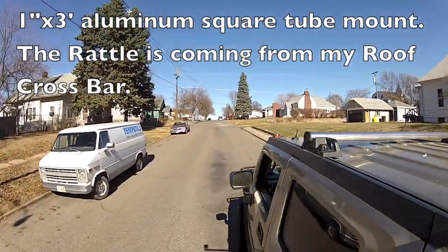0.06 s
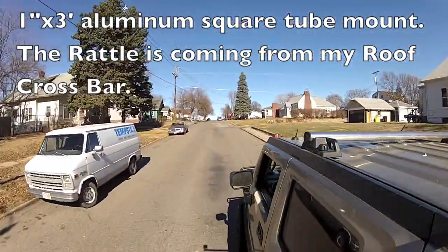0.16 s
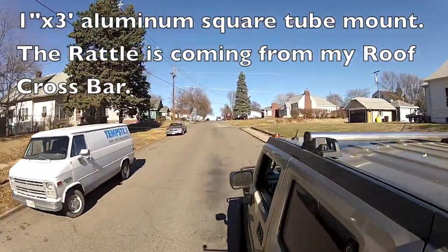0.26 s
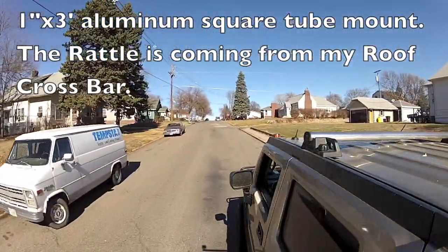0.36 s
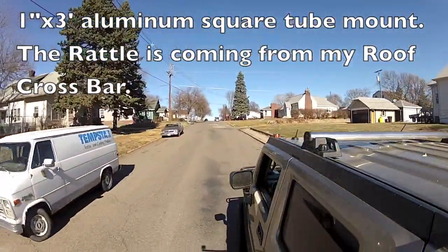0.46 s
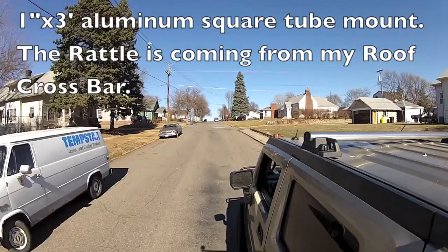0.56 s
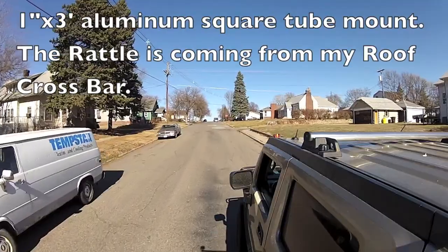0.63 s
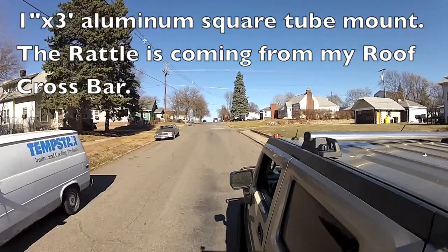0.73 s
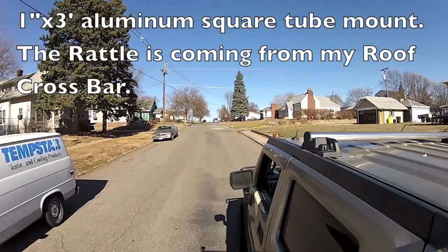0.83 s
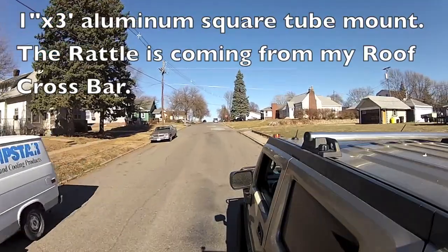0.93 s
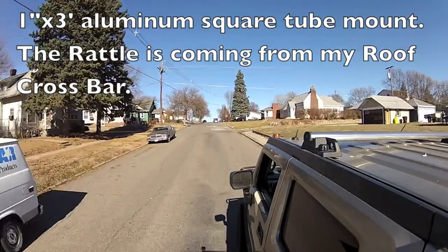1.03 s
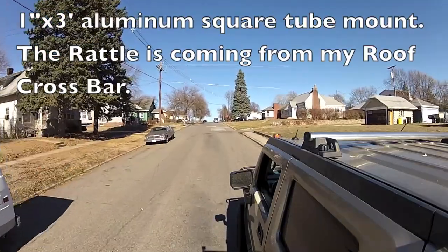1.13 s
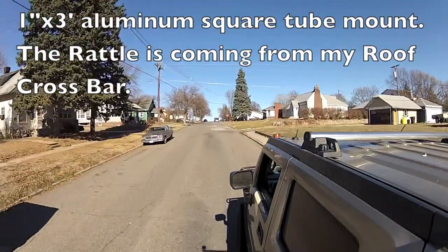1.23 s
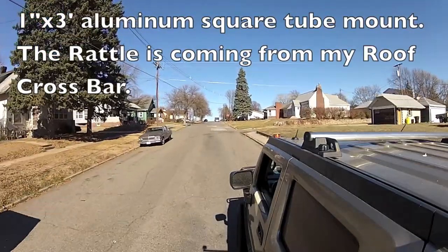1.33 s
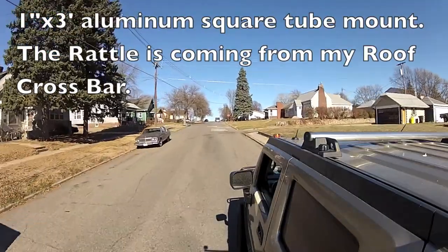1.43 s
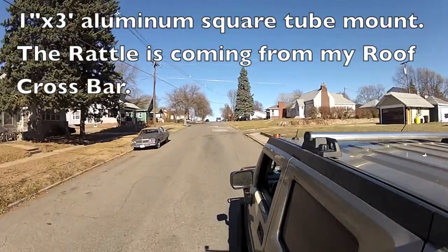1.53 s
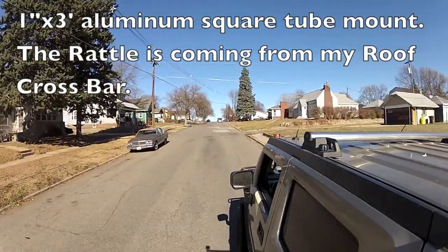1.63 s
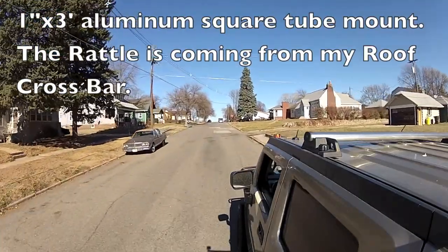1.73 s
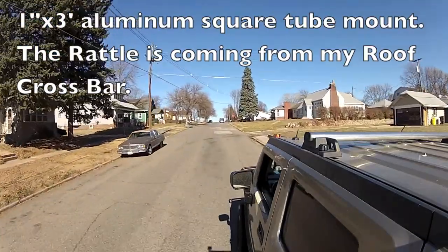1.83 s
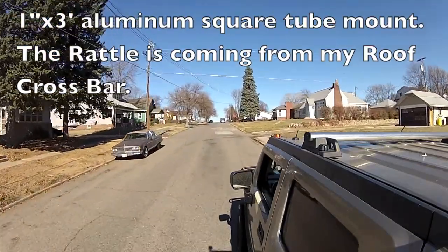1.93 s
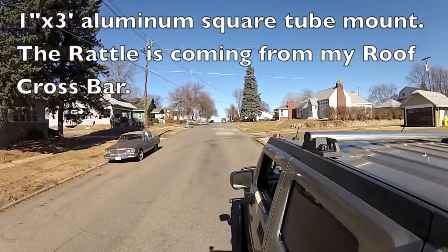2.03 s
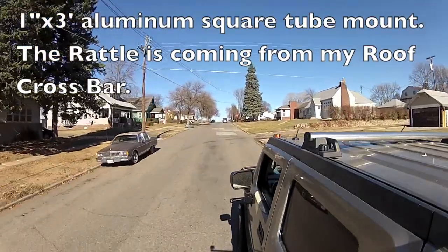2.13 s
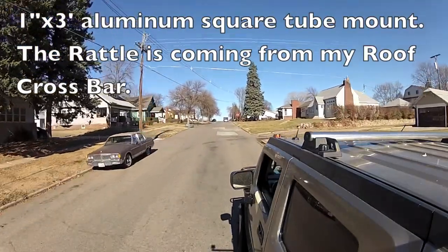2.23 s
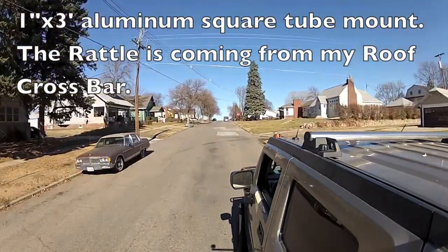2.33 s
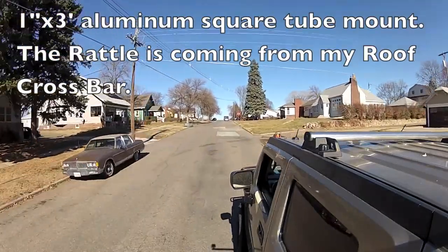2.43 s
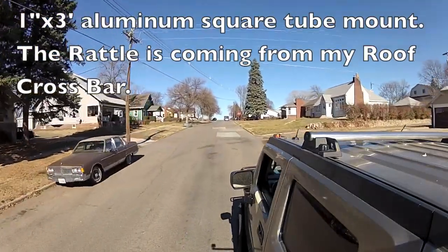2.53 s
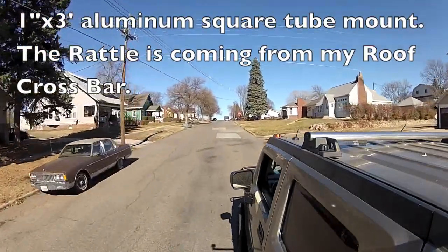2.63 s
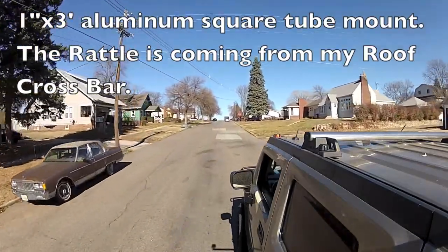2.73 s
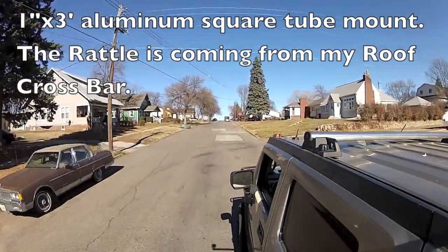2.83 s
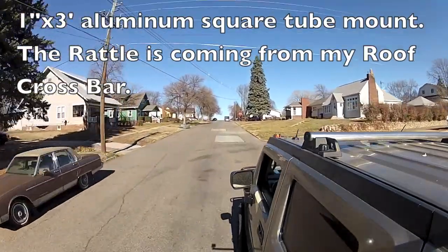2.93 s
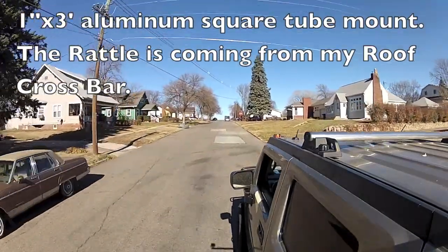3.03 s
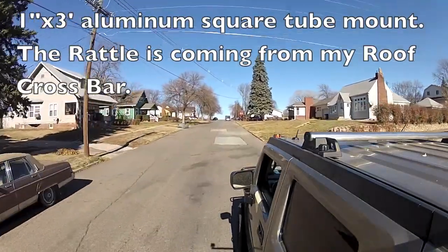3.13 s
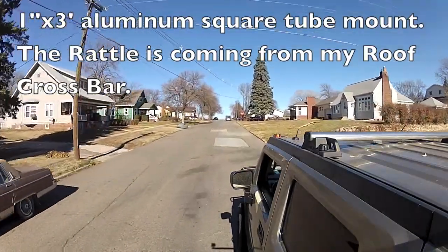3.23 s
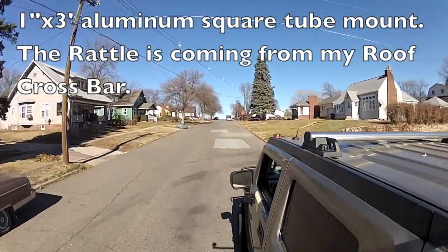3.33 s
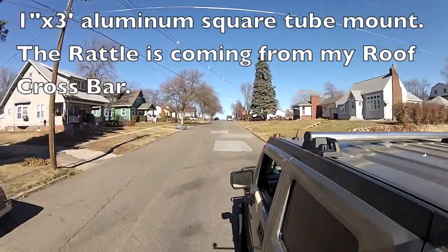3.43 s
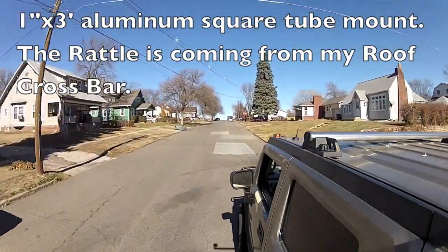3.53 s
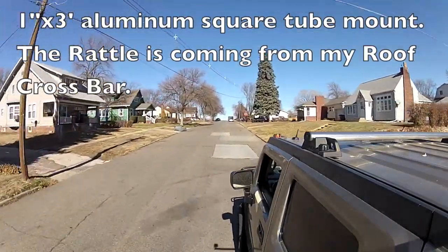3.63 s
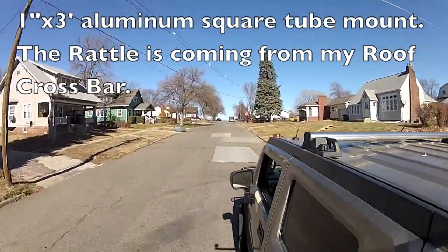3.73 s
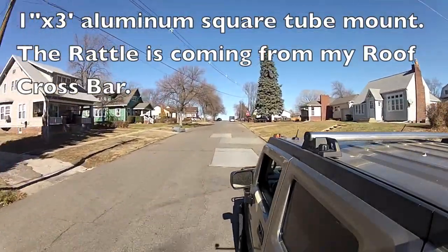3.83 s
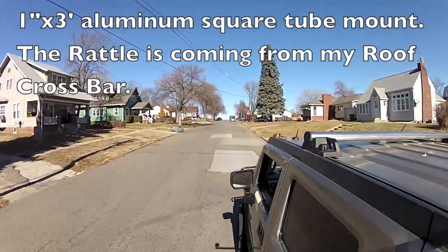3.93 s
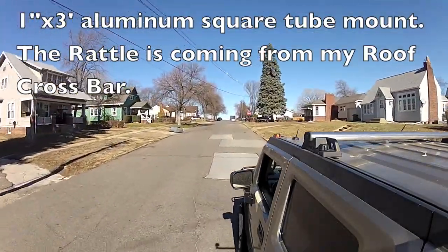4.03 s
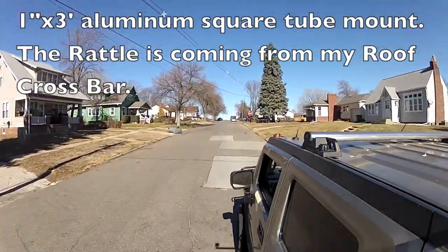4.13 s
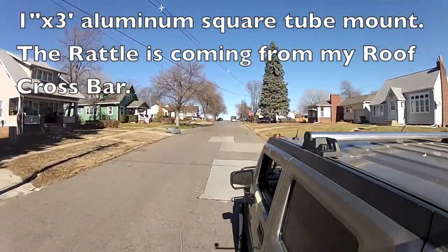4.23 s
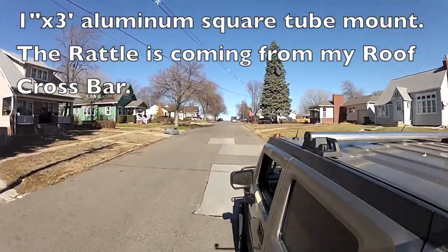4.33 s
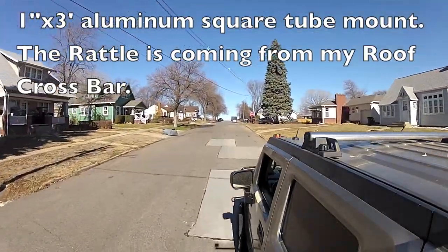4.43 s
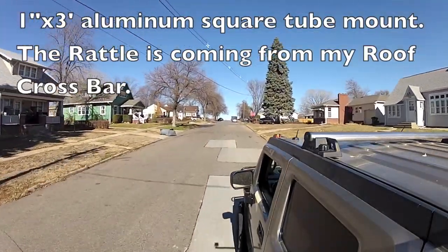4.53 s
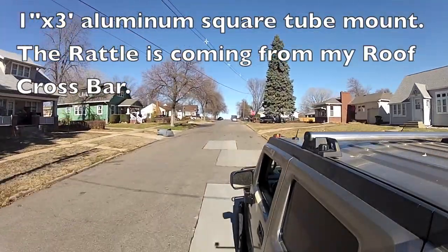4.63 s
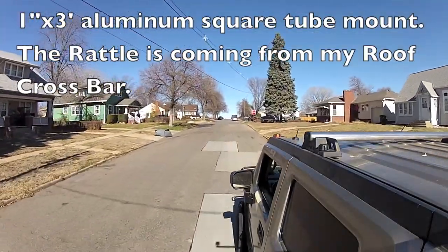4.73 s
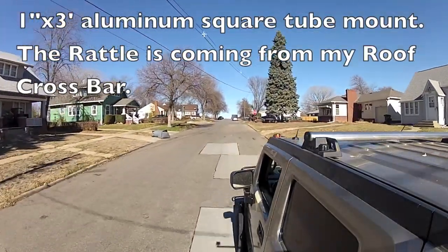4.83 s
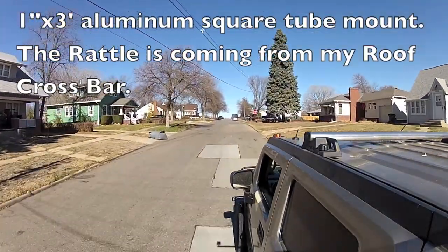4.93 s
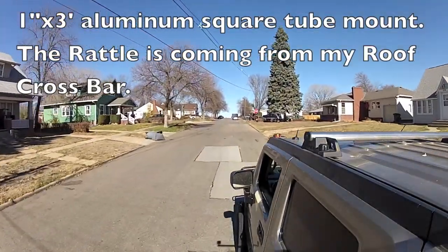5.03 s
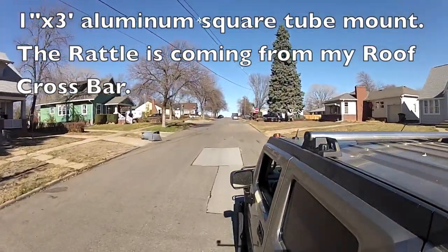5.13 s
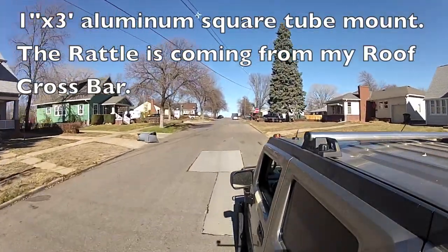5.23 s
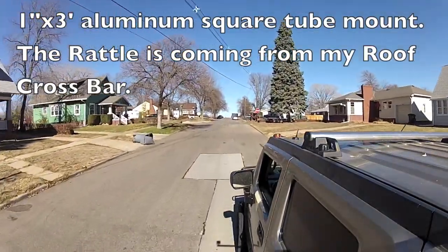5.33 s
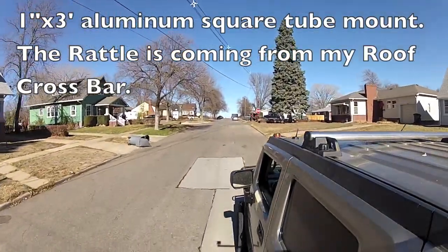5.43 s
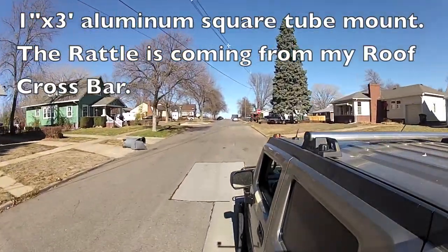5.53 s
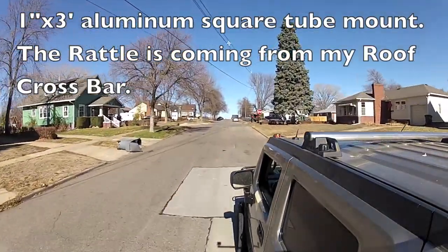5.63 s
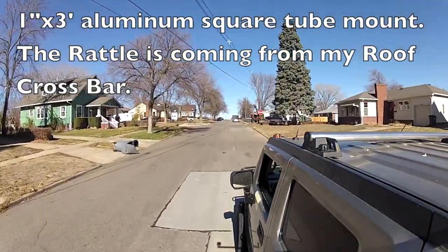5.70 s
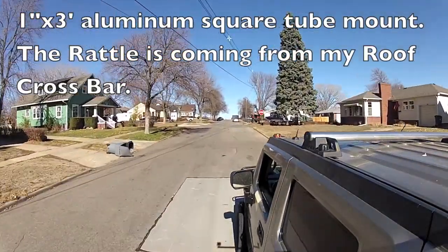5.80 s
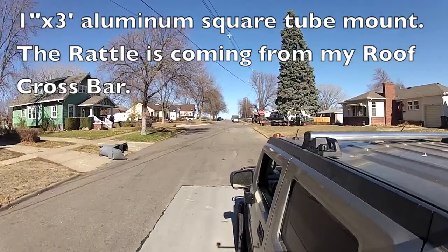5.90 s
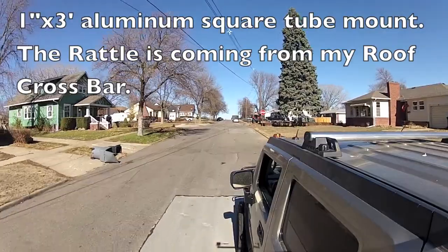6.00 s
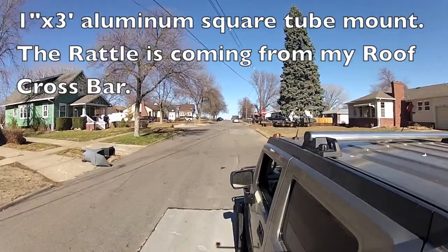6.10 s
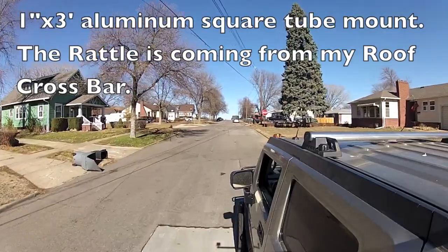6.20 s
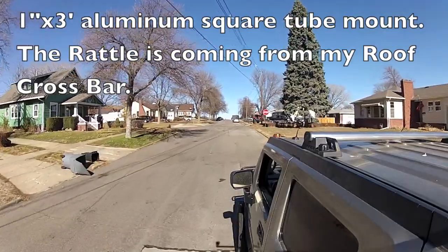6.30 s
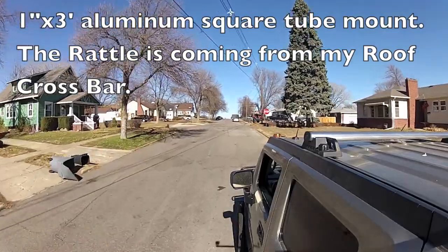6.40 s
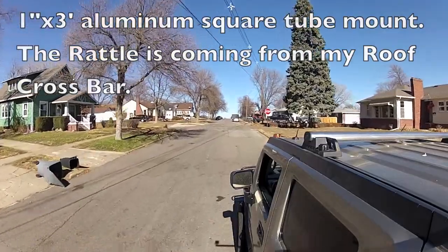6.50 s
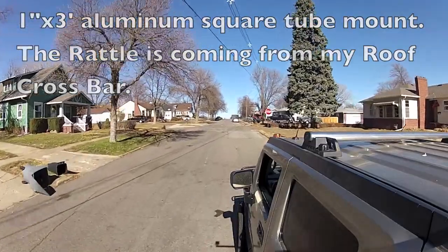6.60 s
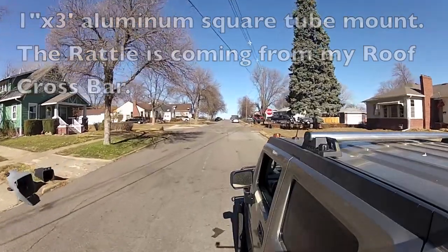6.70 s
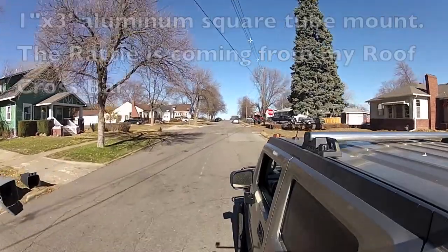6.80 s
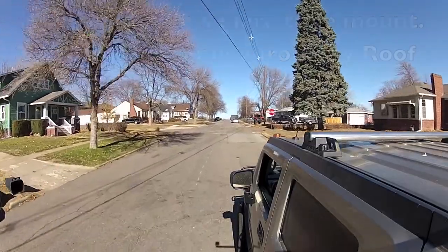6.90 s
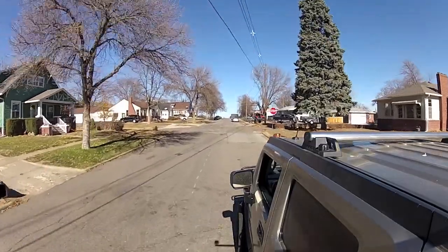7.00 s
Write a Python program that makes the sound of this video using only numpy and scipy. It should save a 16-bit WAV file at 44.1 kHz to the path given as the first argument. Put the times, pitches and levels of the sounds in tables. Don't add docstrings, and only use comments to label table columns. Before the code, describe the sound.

On a roof-mounted camera in a closed housing, a large vehicle's low engine note climbs, then fades beneath rumble and rising wind hiss. A brief squeak comes early. The engine drops out near the middle, and a loose cross bar breaks into dense knocks, bright ticks and a low rail hum over heavy road thumps.

```python
import sys
import numpy as np
from scipy import signal
from scipy.fft import next_fast_len
from scipy.io import wavfile
from scipy.ndimage import uniform_filter1d

SR = 44100
rng = np.random.default_rng(int(sys.argv[2]) if len(sys.argv) > 2 else 0)


def bounce(signal):
    frames = np.transpose(np.atleast_2d(signal))
    limited = np.clip(frames, -1, 1)
    pcm = np.round(limited * 32767).astype(np.int16)
    wavfile.write(sys.argv[1], SR, pcm)


def voltage_ratio(level):
    return 10 ** (np.asarray(level, float) / 20)


N = 311346
T = np.arange(N) / SR

# [t/s, level/dB]
ROAD = [(0, -43.5), (.65, -40.5), (1.4, -41), (1.6, -39), (2.4, -37.5), (2.7, -39.5), (3.1, -37),
        (3.5, -38), (4.2, -35.5), (4.4, -39.5), (4.6, -35), (5.07, -40.5), (5.4, -35.5), (6.05, -40.5),
        (6.4, -37.5), (7.06, -42)]
# [t/s, peak level/dB, fall/s]
HEAVES = [(.86, -18.5, 0.069), (.97, -21, 0.092), (7.0, -9.5, 0.078), (1.43, -20, 0.059),
          (1.68, -18.5, 0.16), (2.08, -19, 0.32), (2.3, -32, 0.44), (2.8, -13, 0.047), (2.91, -20, 0.09),
          (3.07, -12, .06), (3.19, -8, 0.044), (3.29, -14, 0.033), (3.48, -19.5, 0.16), (3.67, -18, 0.17),
          (3.98, -17.5, 0.22), (4.21, -30, .2), (4.58, -7, 0.084), (4.69, -17, 0.03), (4.92, -11.5, 0.095),
          (5.13, -17, 0.081), (5.25, -36.5, 0.073), (5.41, -11.5, 0.076), (5.64, -16.5, 0.039),
          (5.82, -12.5, 0.06), (5.97, -12.5, 0.053), (6.06, -15, 0.046), (6.17, -11.5, 0.039),
          (6.38, -8.5, 0.13), (6.56, -11, 0.13), (6.88, -11, 0.067)]
# [t/s, peak level/dB, fall/s]
JOLTS = [(.6, -20.5, .1), (.86, -30, .1), (1.0, -23, 0.4), (1.26, -16.5, 0.081), (1.48, -26, 0.18),
         (1.63, -20, 0.13), (2.08, -19, 0.19), (2.38, -20.5, 0.3), (2.79, -23, 0.1), (3.0, -26, 0.09),
         (3.14, -18.5, 0.054), (3.22, -18.5, 0.054), (3.44, -16.5, 0.074), (3.77, -17, 0.19),
         (4.21, -18, 0.092), (4.6, -17, 0.054), (4.69, -21, 0.38), (4.95, -10.5, 0.059), (5.33, -16, 0.13),
         (5.53, -10, 0.052), (5.64, -28, 0.029), (5.82, -16.5, 0.093), (5.93, -19.5, 0.067),
         (6.12, -18, 0.039), (6.18, -20.5, 0.048), (6.28, -22.5, 0.096), (6.4, -20, 0.18),
         (6.56, -24, 0.17), (6.88, -25, 0.036), (7.05, -20, 0.098)]
# [f/Hz, width/Hz, level/dB]
FIRST_BENDING = [(27.45, 8.5, 2), (39.34, 7.6, 2)]
SECOND_BENDING = [(107.8, 11.6, 2.5), (132.7, 33, -6.5)]
UPPER_BODY = [(66.7, 35.2, 7), (157.7, 62.7, 3), (272.7, 65.4, -0.5), (325.2, 52.7, 1), (442.8, 9.2, -0.5),
              (528, 37, -9.5), (694, 74, -12.5), (745, 13, -16), (1006, 81, -11.5), (1150, 69, -13.5)]
# [t/s, f/Hz]
SECOND_BENDING_PITCH = [(.62, 122.5), (1.3, 118.9), (1.55, 110.2), (2.0, 114.4), (2.4, 115.6), (2.7, 112),
                        (3.6, 112.9), (4.4, 111.5), (5.28, 110), (7.06, 110.2)]
# [t/s, peak level/dB, low level/dB, body level/dB, high level/dB]
DROPS = [(0.1992, -30, 3, -1, -16), (0.4793, -34.5, -8, -5, -6), (0.5556, -36, 1, -1, -13),
         (0.5938, -33, -2, -2, -8), (0.9275, -33.5, -8, -9, -8), (2.6125, -26, -12, -9, -6),
         (3.4077, -29, 3, -10, -10), (4.1609, -24.5, -4, -10, -15), (4.4672, -27, -8, -7, -7),
         (4.5175, -30.5, 11, 2, 1), (4.557, -9.5, -5, -10, -10), (4.5895, -24, 4, -7, -9),
         (4.6175, -30, -5, -1, -2), (4.7526, -30, -5, -5, -2), (4.7661, -26, -1, -13, -12),
         (4.807, -24, -6, -10, -16), (4.8506, -11, -8, -12.5, -11), (4.9586, -24, -7, -3, -7),
         (5.179, -22.5, -9, -7, -20), (5.253, -21.5, -9, -0.5, -16), (5.3666, -29.5, -1, -11, -16),
         (5.4933, -26, -1, -9, -8), (5.5261, -15.5, -2, -12, -7), (5.7194, -21.5, -7, -5, -12),
         (5.7423, -18.5, -9, -5.5, -10), (5.7997, -20, -7, -7, -9), (6.0038, -33, 1, -7, -8),
         (6.1442, -15.5, -6, -17, -14), (6.3815, -29, 10, -4, -13), (6.6008, -22, 3, -3, -15),
         (6.6272, -24, 5, -7, -8), (6.6447, -16.5, -19, -6.5, -13), (6.7229, -22.5, -3, -7, -18),
         (6.8966, -16, -12, -20, -17), (7.0355, -24.5, 4, -9, -17)]
# [t/s, peak level/dB, low level/dB, body level/dB, high level/dB]
TAPS = [(3.971, -30, -3, -8, -4), (4.0463, -22.5, -4, -7, 3.5), (4.2638, -27.5, -4, -8, 4),
        (4.6425, -21, -14, -5, -1), (4.6644, -33, -7, -7, 0), (4.8918, -21, -8, -2.5, -3),
        (4.9254, -30, 5, 1, -5), (4.9854, -27, 0, -1, 2), (5.024, -26.5, -2, -4, 4),
        (5.1588, -32, -8, -9, 3), (5.232, -22.5, -12, -9, 3), (5.3124, -27.5, 2, -7, -2),
        (5.448, -23.5, -6, -9, -9), (5.5484, -30, 10, -3, -4), (5.5822, -23.5, -10, -11, 0),
        (5.627, -24, -12, -7, -1), (5.668, -23.5, -10, -7, 1), (5.8168, -20, -3, -11, -2),
        (5.871, -29.5, 0, -6, 2), (5.9065, -17.5, -15, -8, -8), (5.9508, -29, -8, -4, -7),
        (5.9924, -32, 0, -5, -1), (6.1684, -24, -12, -9, -1), (6.2395, -19.5, 5, -5.5, -2),
        (6.3261, -19.5, 3, -11, -4), (6.5133, -29.5, 6, -7, 4), (6.5435, -26.5, -3, -6, -4),
        (6.5625, -33, 6, -4, 2), (6.7074, -20.5, -10, -4, 1.5), (6.8864, -22.5, -11, -19, 2),
        (6.9481, -30, 3, -9, 1)]
# [t/s, peak level/dB, high level/dB]
MORE_TAPS = [(4.687, -36, 1), (4.724, -34, -6), (4.997, -31, -3), (5.301, -28, -15), (5.334, -29.5, -13),
             (5.775, -30, -9), (6.109, -29, -14), (6.206, -29, -16), (6.36, -28, -7), (6.468, -38, 9),
             (6.663, -34, -8), (6.688, -27, -18), (6.803, -31.5, -14), (6.974, -34, -3)]
# [f/Hz, level/dB, t60/s]
BAR_LOW = [(290, 3.5, 0.27), (322, 18.5, 0.05), (446, 4, 0.033)]
BAR_BODY = [(550, -1, 0.043), (648, 0.26, 0.066), (750, -0.9, 0.067)]
BAR_MIDDLE = [(960, 3, 0.045), (1050, 7.5, 0.045), (1140, 5, 0.04), (1400, -5, 0.025)]
BAR_HIGH = [(1667, 16, 0.033), (1645, 4.5, 0.03), (1860, -15, 0.011)]
# [t/s, f/Hz, level/dB]
ENGINE = [(0, 118.6, -18), (.32, 125.7, -15), (.45, 131, -16), (.53, 135, -18), (.553, 136.5, -34),
          (.575, 138, -22), (.7, 145.5, -25), (.85, 148.4, -23.5), (.95, 148.5, -29), (1.23, 152.8, -27),
          (1.43, 157.9, -30), (1.7, 166, -28), (1.86, 168.3, -28), (2.21, 166.8, -28.5), (2.87, 165.5, -33),
          (3.05, 157, -27.5), (3.18, 139.6, -28), (3.33, 120, -30)]
# [t/s, level/dB]
WIND = [(0, -56), (.5, -50.5), (.82, -47), (.86, -44), (1.46, -42.5), (1.76, -37.5), (1.81, -35),
        (2.45, -33), (2.65, -35.5), (3.1, -34.5), (4.15, -34.5), (4.74, -41.5), (5.44, -39.5),
        (6.05, -40.5), (6.1, -38.5), (6.6, -47), (6.75, -47.5), (7.06, -39.5)]
# [t/s, level over the flow/dB, half length/s]
GUSTS = [(0.225, 4.5, 0.088), (0.875, 0, .1), (1.528, 4, 0.071), (2.068, 7, 0.089), (2.354, 1.5, 0.15),
         (3.132, 4, 0.041), (3.683, 4, 0.18), (3.938, -3, 0.068), (4.02, 3, 0.04), (4.173, 2, 0.12),
         (4.834, 2, 0.064), (5.077, -7.5, 0.076), (5.274, 3, 0.034), (5.78, 2, 0.059), (6.53, 9, 0.43)]
# [f/Hz, width/Hz, level/dB]
HOUSING = [(683, 230, -12.5), (1018, 141, -5), (1423, 440, -6.5), (1895, 88, -0.5), (2299, 134, 1.5),
           (2644, 313, -4.5), (3110, 224, -11), (3465, 76, -8.5), (3824, 147, -15), (4580, 100, -20),
           (5480, 200, -21)]
# [t/s, peak level/dB, fall/s]
RAIL_HUMS = [(4.52, -28, 0.045), (4.605, -25.5, .04), (4.77, -35, 0.04), (4.9, -29, .07), (5.12, -33, .05),
             (5.26, -27.5, .06), (5.34, -31, 0.11), (5.45, -34, .05), (5.55, -27, .04), (5.72, -33, .08),
             (5.92, -32.5, 0.082), (6.12, -31, 0.055), (6.255, -26, 0.039), (6.36, -29, .1),
             (6.53, -33, .1), (6.7, -33, 0.061), (6.82, -38, 0.05)]
# [f/Hz, width/Hz, level/dB]
RAIL = [(262, 40, -3), (316, 39, 1), (365, 44, -4)]
# [t/s, level/dB]
RUB = [
    (1.51, -45),
    (1.58, -34),
    (1.63, -36),
    (1.65, -48),
]
# [f/Hz, width/Hz, level/dB]
RUB_TONE = [(1140, 76, 6), (1570, 570, -11), (700, 300, -2), (2260, 330, -10)]


def tube():
    road_db, = columns(ROAD)
    first = band(resonant_noise(FIRST_BENDING, 0, 1), 2, 15, 50)
    first = steadied(first, window_s=0.043, share=0.75)
    first_calm_db = road_db + 11.5 + 1.0 * T

    second = band(resonant_noise(SECOND_BENDING, 0, 1), 2, 80, 160)
    second = steadied(second, window_s=0.027, share=0.24)
    rest_hz = 112
    shift = 2 * np.pi * np.cumsum(columns(SECOND_BENDING_PITCH)[0] - rest_hz) / SR
    second = np.real(signal.hilbert(second, next_fast_len(N))[:N] * np.exp(1j * shift))
    second_calm_db = road_db + 8

    upper = resonant_noise(UPPER_BODY, patchy_db=1.44, patchy_rate=4.0)
    thump_db = -13
    upper_calm_db = road_db + 7.5 - thump_db + 1.3 * drift(9.9)
    thumps = voltage_ratio(thump_db) * jolted(JOLTS, upper_calm_db)
    return jolted(HEAVES, first_calm_db) * first + jolted(JOLTS, second_calm_db) * second + thumps * upper


def cross_bar():
    drop_chatter_ms, tap_chatter_ms = 3.3, 3.4
    more_tap_low_db, more_tap_body_db = 2, -5
    rows = [(*row, drop_chatter_ms) for row in DROPS]
    rows += [(*row, tap_chatter_ms) for row in TAPS]
    rows += [(s, peak, more_tap_low_db, more_tap_body_db, high, tap_chatter_ms) for s, peak, high in MORE_TAPS]
    s, peak_db, low_db, body_db, high_db, chatter_ms = np.transpose(rows)

    bumps = rng.laplace(size=(len(s), 4096))
    bumps[:, 66] += 2.2 * np.sqrt(66)
    low = voltage_ratio(low_db - 2.5)[:, None] * clack(BAR_LOW, bumps, 2.2 * chatter_ms, rise_ms=1.1)
    body = voltage_ratio(body_db + 6.0)[:, None] * clack(BAR_BODY, bumps, 1.5 * chatter_ms, rise_ms=0.77)
    middle = voltage_ratio(4.0) * clack(BAR_MIDDLE, bumps, 1.9 * chatter_ms, rise_ms=1.92)
    high = voltage_ratio(high_db + 4.5)[:, None] * clack(BAR_HIGH, bumps, 0.28 * chatter_ms, rise_ms=0.81)
    knocks = voltage_ratio(peak_db)[:, None] * (low + body + middle + high)

    start = ((s - .0015) * SR).astype(int)
    at = start[:, None] + np.arange(knocks.shape[1])
    rattle = np.bincount(at.ravel(), knocks.ravel())[:N]
    return band(rattle, 3, 200, 1950)


def clack(modes, bumps, chatter_ms, rise_ms):
    ms = np.arange(bumps.shape[1]) * 1000 / SR
    swell = 1 - np.exp(-ms / rise_ms)
    contact = bumps * swell * np.exp(-ms / np.maximum(chatter_ms, .5)[:, None])
    strength_db = rng.standard_normal((len(bumps), len(modes)))
    out = 0
    for k, (hz, db, t60) in enumerate(modes):
        out = out + voltage_ratio(db + strength_db[:, [k]]) * ring(contact, hz, t60)
    return out / np.abs(out).max(axis=1, keepdims=True)


def engine():
    hz, level_db = columns(ENGINE)
    turn = 2 * np.pi * np.cumsum(hz + .3 * drift(8.0)) / SR
    body_boom = 1 / (1 + ((2 * hz - 312) / 22) ** 2)
    octave = body_boom * voltage_ratio(-13 + 3.1 * drift(12.0)) * np.sin(2 * turn)
    panel_boom = 1 / (1 + ((1.5 * hz - 254) / 8) ** 2)
    fifth = panel_boom * voltage_ratio(-13 + 3.0 * drift(5.0)) * np.sin(1.5 * turn)
    note = np.sin(turn) + octave + fifth

    pulling_away = ramp([.97, 1.17], [1, 0])
    shaft = voltage_ratio(-32 + 2.5 * drift(3.0)) * np.sin(turn / 4) * pulling_away
    sounding = ramp([3.3, 3.5], [1, 0])
    flutter_db = 2.3 * drift(11.0)
    return np.sqrt(2) * (shaft + note * sounding * voltage_ratio(level_db + flutter_db))


def wind():
    flow_db, = columns(WIND)
    low = resonant_noise(HOUSING[:3], patchy_db=0.4, patchy_rate=4.0)
    panel = resonant_noise(HOUSING[3:9], patchy_db=0.66, patchy_rate=28.0)
    top = resonant_noise(HOUSING[9:], patchy_db=1.0, patchy_rate=33.0)

    gust_db = sum(ramp([s - half, s, s + half], [0, db, 0]) for s, db, half in GUSTS)
    gusts_per_s = 7.1
    level_db = flow_db + gust_db + 0.37 * drift(gusts_per_s) + 1.5 + 0.57 * drift(25.0)
    low_db = -1.0 - 0.73 * gust_db
    top_db = -19.5 + 0.38 * (flow_db + 45.5) - 1.0 * T
    top_db = top_db + 0.5 * drift(gusts_per_s)
    return voltage_ratio(level_db) * (voltage_ratio(low_db) * low + panel + voltage_ratio(top_db) * top)


def rail():
    hum = band(resonant_noise(RAIL, 0, 1), 2, 220, 420)
    return jolted(RAIL_HUMS, -70) * steadied(hum, window_s=0.027, share=0.6)


def rub():
    level_db, = columns(RUB)
    sliding = ramp([1.51, 1.53, 1.63, 1.645], [0, 1, 1, 0])
    return sliding * voltage_ratio(level_db + 4.6 * drift(61.5)) * resonant_noise(RUB_TONE, 0, 1)


def loose_ticks():
    road_db, = columns(ROAD)
    ticks_per_s, spread_db = 72, 3.5
    rough = ramp([4.5, 4.65], [.25, 1])
    strength = voltage_ratio(spread_db * np.minimum(rng.exponential(1, N), 3))
    born = (rng.random(N) < ticks_per_s / SR) * strength
    out = 0
    for hz, db, t60 in BAR_BODY + BAR_MIDDLE + BAR_HIGH:
        clicks = born * rng.standard_normal(N) + 1e-18
        out = out + voltage_ratio(db) * ring(clicks, hz, t60)
    return rough * voltage_ratio(road_db - 11) * rms_one(band(out, 2, 400, 2000))


def hiss():
    return voltage_ratio(-59) * rng.standard_normal(N)


def jolted(rows, calm_db):
    s, peak_db, fall_s = np.transpose(rows)[:, :, None]
    t = np.arange(0, N, 32) / SR
    jolt_db = peak_db - 12 * np.abs(t - s) / np.maximum(fall_s, .02)
    power = np.sum(voltage_ratio(jolt_db) ** 2, axis=0)
    return np.sqrt(np.interp(T, t, power) + voltage_ratio(calm_db) ** 2)


def resonant_noise(peaks, patchy_db, patchy_rate):
    white, out = rng.standard_normal(N + SR), 0
    for k, (hz, width, db) in enumerate(peaks):
        r = np.exp(-np.pi * width / SR)
        poles = [1, -2 * r * np.cos(2 * np.pi * hz / SR), r * r]
        tone = signal.lfilter([(1 - r * r) / 2, 0, (r * r - 1) / 2], poles, white)
        out = out + (-1) ** k * voltage_ratio(db + patchy_db * drift(patchy_rate)) * tone[SR:]
    return rms_one(out)


def steadied(x, window_s, share):
    swell = np.sqrt(uniform_filter1d(x ** 2, int(window_s * SR)) + 0.015)
    return rms_one(x / swell ** share)


def ring(x, hz, t60):
    r, w = voltage_ratio(-60 / (t60 * SR)), 2 * np.pi * hz / SR
    return signal.lfilter([0, np.sin(w)], [1, -2 * r * np.cos(w), r * r], x)


def band(x, order, low_hz, high_hz):
    return signal.sosfilt(signal.butter(order, [low_hz, high_hz], "band", fs=SR, output="sos"), x)


def drift(rate):
    r = np.exp(-80 * np.pi * rate / SR)
    slow = signal.lfilter([1], [1, -2 * r, r * r], rng.standard_normal(N // 40 + 1002))[1000:]
    return np.interp(np.arange(N) / 40, np.arange(len(slow)), rms_one(slow))


def columns(rows):
    s, *values = np.transpose(rows)
    return [ramp(s, v) for v in values]


def ramp(s, values):
    return np.interp(T, s, values)


def rms_one(x):
    return x / np.sqrt(np.mean(x ** 2))


def scene():
    heard = tube() + cross_bar() + engine() + wind() + rail() + rub() + loose_ticks() + hiss()
    return signal.sosfilt(signal.butter(2, 17.8, "high", fs=SR, output="sos"), heard)[None]


def top_cut(x):
    return signal.sosfilt(signal.butter(12, 15680, fs=SR, output="sos"), x)


def record(dry):
    stored_hz, played_hz = 12000, 48000
    edge = signal.butter(6, 5600.0, fs=SR, output="sos")
    stored = signal.resample_poly(signal.sosfilt(edge, dry), stored_hz, SR, axis=1, padtype="reflect")
    held = np.repeat(stored, played_hz // stored_hz, axis=1)
    played = signal.resample_poly(held, SR, played_hz, axis=1, padtype="reflect")[:, :N]
    played = signal.sosfilt(signal.ellip(12, .5, 75, 15200, fs=SR, output="sos"), played)
    length = played.shape[1]
    stop_fade_s = .006
    played = played * np.minimum(np.arange(length)[::-1] / (stop_fade_s * SR), 1)
    mix = np.pad(played, ((0, 0), (0, N - length)))
    return top_cut(mix)


dry = scene()
out = record(dry)
bounce(out)
```